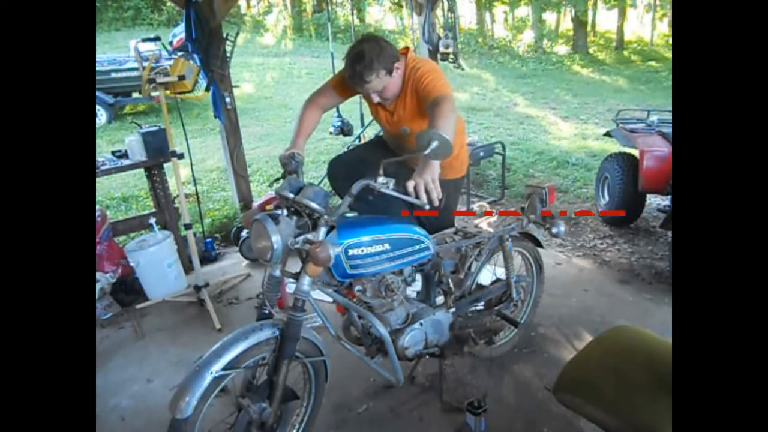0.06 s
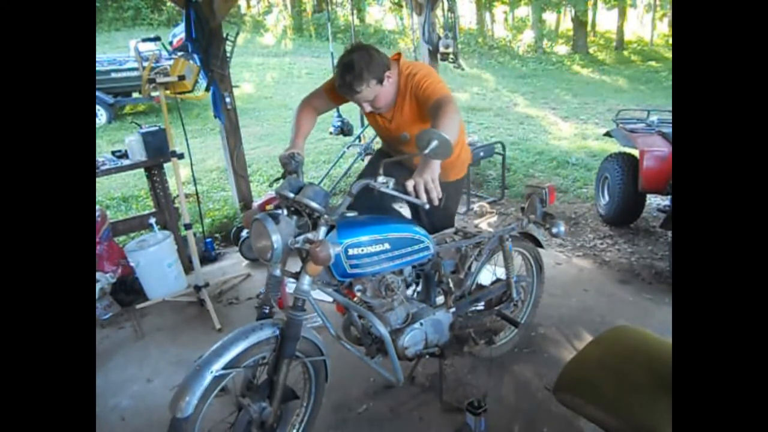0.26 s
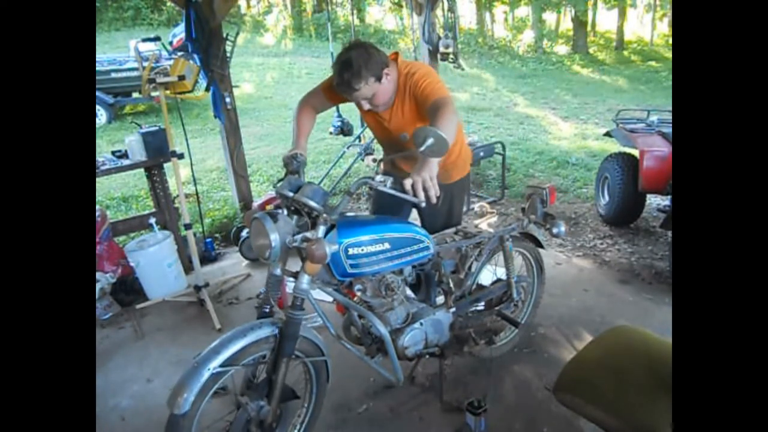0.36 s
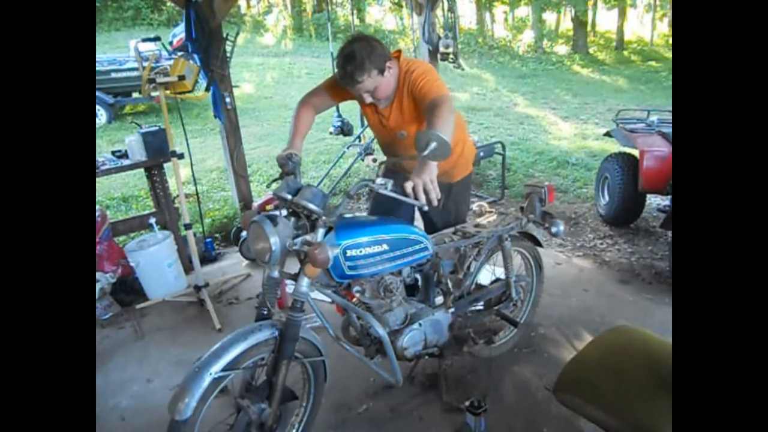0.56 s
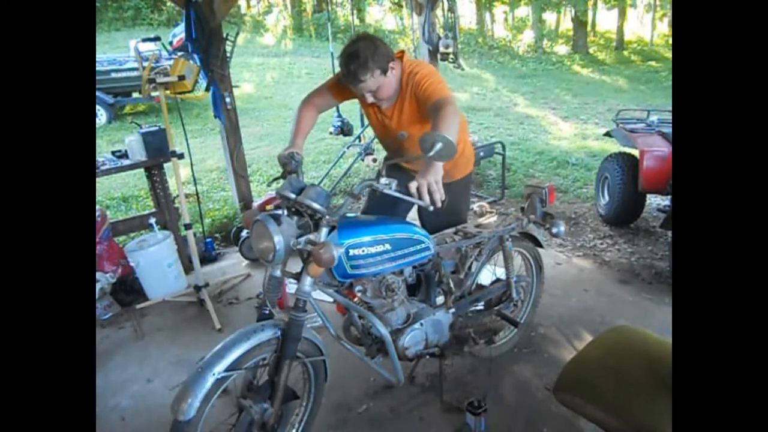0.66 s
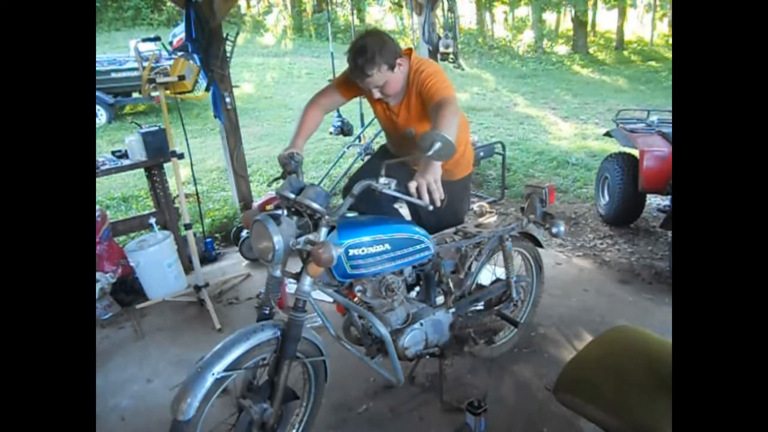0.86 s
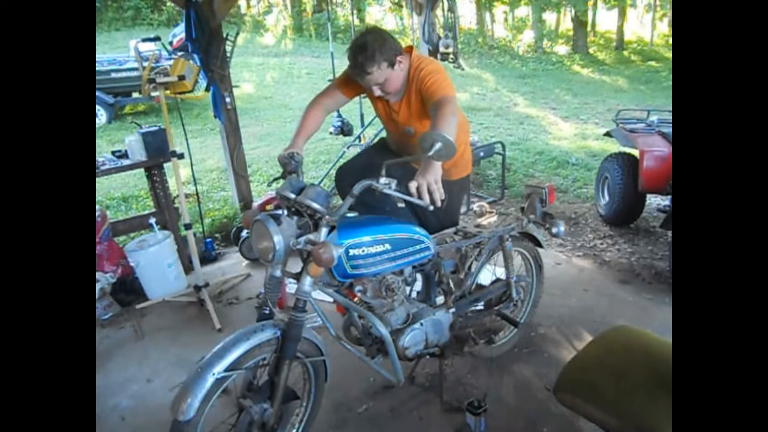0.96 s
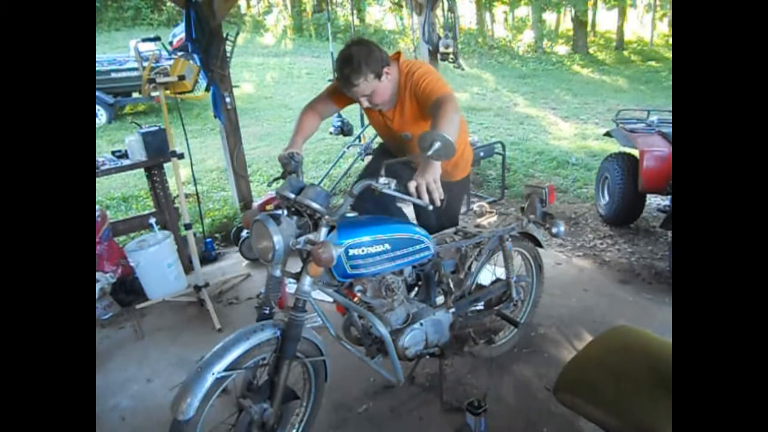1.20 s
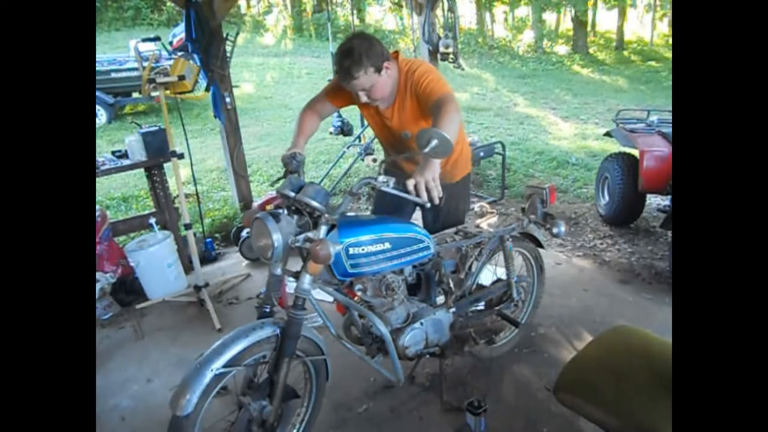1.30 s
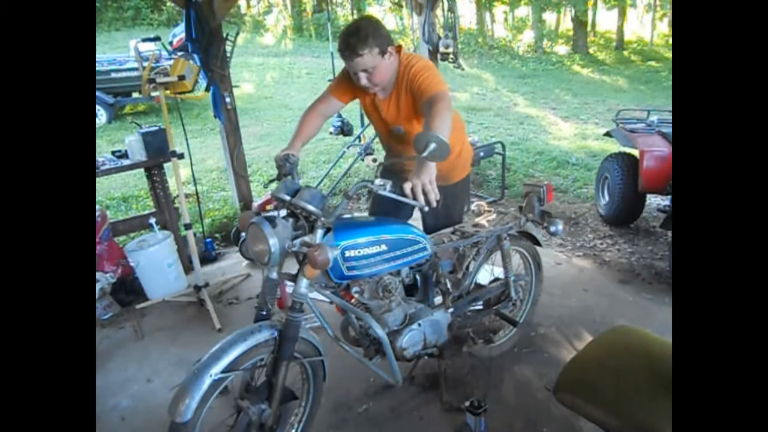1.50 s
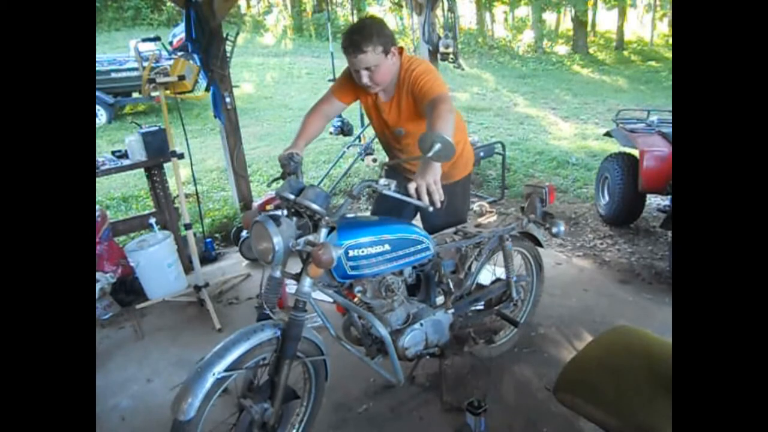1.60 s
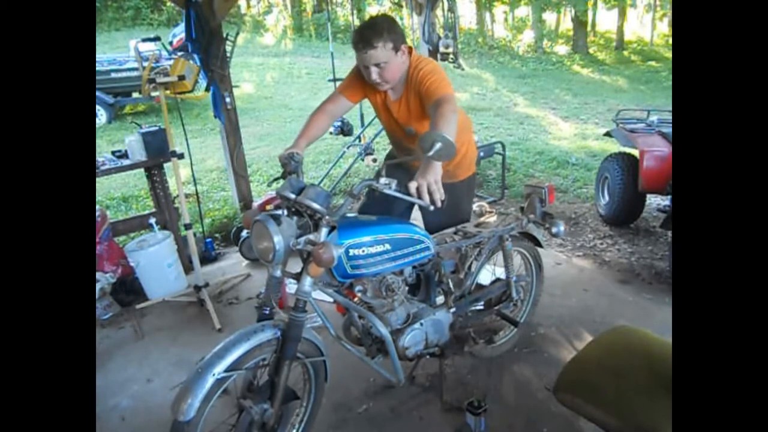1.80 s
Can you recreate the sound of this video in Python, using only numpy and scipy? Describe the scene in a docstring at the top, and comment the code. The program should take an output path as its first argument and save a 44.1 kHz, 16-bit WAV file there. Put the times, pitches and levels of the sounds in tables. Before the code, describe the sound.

An old motorcycle engine is kick-started twice, clattering and puffing briefly without catching.

```python
"""Under an open shed roof, an old motorcycle is kicked over twice and does not catch.
Narrow noise bands scrape, thud, whine and chirp; noisy contacts ring modes of lever, case and valves.
Dense clicks through body resonances rattle as gears, and pulses running to and fro in a pipe puff.
Roof and concrete give a short decaying-noise echo over quiet, coloured outdoor hiss and a faint hum."""
import sys
import numpy as np
from scipy import signal
from scipy.fft import rfft, irfft
from scipy.io import wavfile
from scipy.ndimage import uniform_filter1d

SR = 44100
rng = np.random.default_rng(int(sys.argv[2]) if len(sys.argv) > 2 else 0)


def gain_from_db(level_db):
    """Turn a decibel level (scalar or array-like) into a linear amplitude factor."""
    decades = np.asarray(level_db, float) / 20
    return 10 ** decades


def generate_wav(sig):
    """Save sig (samples, or channels by samples) to the path in sys.argv[1] as 16-bit PCM at SR."""
    pcm = np.round(np.clip(np.atleast_2d(sig).T, -1, 1) * 32767).astype(np.int16)
    wavfile.write(sys.argv[1], SR, pcm)


N = 81585


def band(x, lo_hz, hi_hz):
    """Band-pass."""
    sos = signal.butter(2, [lo_hz, min(hi_hz, SR / 2.2)], "bandpass", fs=SR, output="sos")
    return signal.sosfilt(sos, x)


def unit(x):
    """Scale to rms 1."""
    return x / np.sqrt(np.mean(x ** 2) + 1e-18)


def onset_unit(x):
    """Scale so that the first 10 ms have rms 1."""
    return x / np.sqrt(np.mean(x[:SR // 100] ** 2))


def colour(x, curve):
    """Apply a (frequency [Hz], gain [dB]) curve."""
    hz, curve = np.fft.rfftfreq(N, 1 / SR) + 1, np.array(curve)
    gain_db = np.interp(np.log(hz), np.log(curve[:, 0]), curve[:, 1])
    return irfft(rfft(x) * gain_from_db(gain_db), N)


def add(out, s, x):
    """Mix x in at s seconds."""
    i = int(s * SR)
    out[i:i + len(x)] += x[:N - i]


def ring(x, modes):
    """Decaying resonances driven by x, one two-pole filter per mode."""
    out = 0
    for hz, db, t60_s in modes:
        radius = np.exp(-np.log(1000) / (t60_s * SR))
        w = 2 * np.pi * hz / SR
        out = out + gain_from_db(db) * signal.lfilter([0, np.sin(w)], [1, -2 * radius * np.cos(w), radius ** 2], x)
    return out


BITE_S = 0.00066  # rise of the contact
STRIKE_DB = 13.5  # first hard contact, over the chatter
CRACK_DB, LOW_CRACK_DB = -3.5, -22  # unpitched part over the ring; the low knock is mostly pitched
TAIL_DB, TAIL_T60_S = 15, 0.02


def blows(table, modes):
    """A strike and a few ms of chattering contact crack, ring the part's modes and leave a short noisy tail."""
    out, t = np.zeros(N), np.arange(SR // 4) / SR
    for s, mid_db, low_db, high_db, contact_s in table:
        chatter, hiss = rng.standard_normal((2, len(t)))
        contact = chatter * np.minimum(t / BITE_S, 1) * np.exp(-t / contact_s)
        tail = hiss * np.minimum(t / contact_s, 1) * gain_from_db(TAIL_DB - 60 * t / TAIL_T60_S)
        rung = ring(contact + gain_from_db(STRIKE_DB) * (t == 0), modes)
        for lo, hi, db, crack_db in ((600, 1500, low_db, LOW_CRACK_DB),
                                     (1650, 5000, 0, CRACK_DB),
                                     (5000, 12000, high_db, CRACK_DB)):
            # filtered twice for steep band edges
            pitched = onset_unit(band(band(rung, lo, hi), lo, hi))
            crack = onset_unit(band(band(contact, lo, hi), lo, hi))
            noisy_tail = band(tail, lo, hi) / band(hiss, lo, hi).std()
            add(out, s, gain_from_db(mid_db + db) * (pitched + gain_from_db(crack_db) * (crack + noisy_tail)))
    return out


AIR_DB, AIR_START_DB, AIR_SETTLES_S = -44.5, 5.5, 0.34  # the hiss is a little louder at first
HUM_HZ, HUM_DB = 119, -57.5
# spectrum of the outdoor air: (frequency [Hz], relative density [dB per Hz])
AIR_SPECTRUM = [(20, 11.5), (60, 2.5), (120, -2.5), (250, -3.5), (450, -4), (1100, -7), (3000, -10),
                (6000, -13.5), (10000, -15), (13000, -22)]


def air():
    """Soft outdoor hiss and far rumble from coloured noise, with a faint wavering hum from a narrow band."""
    hum = gain_from_db(HUM_DB) * unit(band(rng.standard_normal(N), HUM_HZ - 4, HUM_HZ + 4))
    hiss = unit(colour(rng.standard_normal(N), AIR_SPECTRUM))
    level_db = AIR_DB + AIR_START_DB * np.exp(-np.arange(N) / SR / AIR_SETTLES_S)
    return hum + hiss * gain_from_db(level_db)


# narrow scrapes, squeaks and soft thuds, probably lever pivot, spring and boot,
# with a long faint insect whine near 7.8 kHz and a faint bird-like chirp near 5.5 kHz:
# (time [s], length [s], frequency [Hz], width [Hz], level [dB])
NARROW_SOUNDS = [(0.106, 0.07, 3220, 800, -41), (0.2, 0.16, 980, 385, -33), (0.215, 0.14, 2970, 400, -37),
                 (0.628, 0.041, 2700, 493, -41.5), (0.679, 0.056, 544, 120, -43),
                 (0.689, 0.1, 410, 110, -47), (0.612, 0.32, 7830, 197.6, -63.5),
                 (0.872, 0.05, 5500, 400, -55), (1.113, 0.068, 7800, 600, -47),
                 (1.228, 0.019, 8000, 500, -38), (1.183, 0.081, 130, 119, -38.5),
                 (1.688, 0.059, 110, 90, -52), (1.726, 0.072, 750, 870, -43),
                 (1.799, 0.073, 7200, 800, -54)]


def squeaks_and_calls():
    """Narrow rough noise bands that come quickly and fade."""
    out = np.zeros(N)
    for s, length_s, hz, width_hz, db in NARROW_SOUNDS:
        n = int(length_s * SR)
        swell = np.sin(np.pi * np.sqrt(np.arange(n) / n))  # peaks a quarter of the way in
        rough = unit(band(rng.standard_normal(SR), hz - width_hz / 2, hz + width_hz / 2))[:n]
        add(out, s, gain_from_db(db) * swell * rough)
    return out


# knocks of the kick lever: (time [s], mid level [dB], low over mid [dB], high over mid [dB], contact decay [s])
LEVER_HITS = [(.1092, -42, -5.5, 2.5, 0.012), (.198, -41, 0, 8, 0.01), (.2045, -30, 10.5, 2, 0.00079),
              (.2473, -47.5, -21, 12, 0.021), (.3257, -29.5, -2, -1, 0.017),
              (1.0979, -44.5, -5.5, 1, 0.0058), (1.1643, -43.5, -23, 2, 0.0081),
              (1.1812, -37.5, -30, 5.5, 0.0039), (1.1845, -36, 13, -21, 0.00091),
              (1.2321, -50.5, 15, 5, 0.011), (1.838, -65.5, 14, 16.5, 0.01)]
# resonances of the lever: (frequency [Hz], relative level [dB], T60 [s])
LEVER_RESONANCES = [(867, 17.5, 0.024), (1108, -9, 0.27), (2160, -35, 0.12), (3043, -6, 0.038),
                    (2973, -21, 0.39), (3340, -19, 0.15), (3600, -13, 0.069), (4900, -15, 0.0088),
                    (5750, 0, 0.016), (6580, -2.5, 0.015), (7600, 7, 0.0047), (8180, 4.5, 0.012),
                    (9440, 6.5, 0.012)]


def lever_blows():
    """Boot, pawl and stops knock the lever, whose modes ring."""
    return blows(LEVER_HITS, LEVER_RESONANCES)


RATTLE_PER_S, RATTLE_SCATTER_DB = 2500, 1.5  # click rate; mean of the random boost per click
CATCH_DB = 0.96  # rms level wobble: teeth bind and free unevenly
# crank and gear train turning, one list per kick: (time [s], rattle level [dB], high over low body [dB])
KICK_TURNS = [
    [(.195, -44, 9), (.212, -25.5, -5), (.24, -36, -3), (.3, -34, 5), (.345, -28.5, -7), (.36, -19.5, 1.5),
     (.41, -23, -3), (.45, -20, -5), (.5, -27, -12), (.524, -33, 3), (.535, -22.5, -1.5), (.62, -42, 4),
     (.7, -47, -1), (.8, -62, -24)],
    [(1.178, -67, -2), (1.195, -28, -10.5), (1.25, -36, -7.5), (1.275, -28.5, -6), (1.33, -23, -4),
     (1.38, -21.5, -7.5), (1.43, -28.5, -1.5), (1.455, -23.5, -1.5), (1.528, -36.5, -2),
     (1.542, -26.5, -12), (1.6, -54.5, 6), (1.7, -51.5, -1.5)],
]
# lower resonances of the crankcase: (frequency [Hz], width [Hz], relative level [dB])
LOW_BODY = [(130, 243, 0.5), (435, 207, 6.5), (800, 330, 7.5), (1402, 397, 6), (1865, 493, 5.5),
            (2890, 1020, 5.5)]
# upper resonances of the crankcase: (frequency [Hz], width [Hz], relative level [dB])
HIGH_BODY = [(3840, 1860, 6), (5700, 930, 3.5), (7100, 420, 1.5), (8980, 500, -6), (9660, 2900, 3)]


def case_body(clicks, peaks):
    """Crankcase resonances as a weighted sum of noisy click bands."""
    return unit(sum(gain_from_db(db) * unit(band(clicks, hz - width_hz / 2, hz + width_hz / 2))
                    for hz, width_hz, db in peaks))


def rattle():
    """Dense uneven tooth clicks, blended with noise, ring the crankcase while the crank turns."""
    t = np.arange(N) / SR
    turn_s, turn_db, bright_db = np.concatenate([np.array(kick) for kick in KICK_TURNS]).T
    happens, side, strength = rng.random((3, N))
    clicks = (happens < RATTLE_PER_S / SR) * np.sign(side - .5)
    clicks = clicks * gain_from_db(-RATTLE_SCATTER_DB * np.log(strength + 1e-9))
    clicks = unit(clicks) + 1.27 * rng.standard_normal(N)
    catch = gain_from_db(CATCH_DB * unit(band(rng.standard_normal(N), 24, 193)))
    turning = sum((t > kick[0][0]) * (t < kick[-1][0]) for kick in KICK_TURNS)
    brightness = gain_from_db(np.interp(t, turn_s, bright_db))
    body = case_body(clicks, LOW_BODY) + brightness * case_body(clicks, HIGH_BODY)
    return turning * catch * gain_from_db(np.interp(t, turn_s, turn_db)) * body


# clanks of the case: (time [s], mid level [dB], low over mid [dB], high over mid [dB], contact decay [s])
CASE_HITS = [(.3462, -34, 11.5, -11, 0.0011), (.405, -35, 12, 9.5, 0.015), (.4279, -20.5, 6, 4, 0.0046),
             (.5258, -21.5, -19, 5, 0.0038), (1.2945, -31, 2, -4, 0.0017), (1.2994, -34, 0.5, 8.5, 0.0016),
             (1.311, -32.5, 5, -6, 0.0022), (1.3528, -18.5, -1.5, -3, 0.0076),
             (1.412, -34.5, -18, 4, 0.0022), (1.4406, -23, -5, 8, 0.0053)]
# resonances of the case: (frequency [Hz], relative level [dB], T60 [s])
CASE_RESONANCES = [(1289.5, 4, 0.12), (1450, 7.5, 0.046), (1934, 22, 0.0096), (2290, 8.5, 0.1),
                   (2426, 8, 0.074), (2802, 9.5, 0.033), (3660, -8.5, 0.081), (3926, 3, 0.12),
                   (5190, 13.5, 0.0044), (5440, 1.5, 0.01), (6525, 17, 0.0099), (6430, -8.5, 0.03),
                   (8010, 11, 0.0084), (8440, 14.5, 0.0068)]


def case_clanks():
    """Hard contacts clank against the case, whose modes ring."""
    return blows(CASE_HITS, CASE_RESONANCES)


# snaps of the valves: (time [s], mid level [dB], low over mid [dB], high over mid [dB], contact decay [s])
VALVE_HITS = [(.3521, -27, 2.5, 7.9, 0.0062), (.4808, -29.5, -8, 5, 0.0097),
              (1.2595, -34, -0.5, 7.5, 0.011), (1.3715, -26.5, 4.5, 3.9, 0.0089),
              (1.5304, -43.5, 9, 11.6, 0.004)]
# resonances of the valves: (frequency [Hz], relative level [dB], T60 [s])
VALVE_RESONANCES = [(900, -12, 0.044), (1980, 8.5, 0.024), (3190, 9.5, 0.017), (7000, -28, 0.012),
                    (7800, 7, 0.013), (8690, 15, 0.019), (9760, 16, 0.0061), (10860, 21, 0.005)]


def valve_snaps():
    """Valves snap with a bright crack and short ringing modes."""
    return blows(VALVE_HITS, VALVE_RESONANCES)


PUFF_DIP, PUFF_FALL = .6, 1.1  # scale of the dip; decay rate of the peak per front width
END_TRIP_S, END_KEEP = 0.00597, 0.7  # delay and strength of the inverted return
PIPE_TRIP_S, PIPE_KEEP, PIPE_RING_DB = .0208, 0.48, -42  # repeat delay, strength kept each trip
GAS_DB, GAS_T60_S = -8.5, 0.16  # gas noise over its puff
# exhaust puffs: (time [s], level [dB], front width [s])
EXHAUST_PUFFS = [(0.3702, -9.5, .0008), (0.4948, -15, 0.00078), (1.2736, -12, 0.00074),
                 (1.3839, -14.5, 0.00087), (1.5483, -21.5, 0.00077)]
# resonances of the exhaust pipe: (frequency [Hz], relative level [dB], T60 [s])
PIPE_RESONANCES = [(104.7, -7, 0.28), (146.6, -7.5, 0.1), (241, -1.5, 0.038), (410, 3, 0.15)]


def exhaust():
    """Each opening valve sends a dip-then-peak pulse; the open end inverts it, it runs to and fro, gas rushes."""
    pulses, gas = np.zeros(N), np.zeros(N)
    t = np.arange(-SR // 200, SR // 5) / SR  # starts 5 ms early to hold the dip
    for s, db, width_s in EXHAUST_PUFFS:
        u = t / width_s
        pulse = np.e * u * np.exp(-np.abs(u) * np.where(u < 0, 1, PUFF_FALL))
        add(pulses, s - 1 / 200, gain_from_db(db) * pulse * np.where(u < 0, PUFF_DIP, 1))
        add(gas, s - 1 / 200, (t > 0) * gain_from_db(db + GAS_DB - 60 * t / GAS_T60_S))
    returned = uniform_filter1d(np.roll(pulses, int(END_TRIP_S * SR)), size=40)
    trip, out = pulses - END_KEEP * returned, np.zeros(N)
    for k in range(5):
        out += PIPE_KEEP ** k * np.roll(trip, int(k * PIPE_TRIP_S * SR))
        trip = uniform_filter1d(trip, size=20)  # each trip blunts the pulse
    rush = gas * unit(band(rng.standard_normal(N), 115, 510))
    return out + gain_from_db(PIPE_RING_DB) * ring(pulses, PIPE_RESONANCES) + rush


SHED_DB, SHED_GAP_S = -10.5, 0.0043  # echo level, wait before the echo
SHED_T60_S, SHED_TREBLE_T60_S = 0.38, 0.26


def shed(x):
    """Diffuse echoes from roof, floor and benches as decaying noise; the treble dies first."""
    t = np.arange(SR // 2) / SR
    noise = rng.standard_normal(len(t))
    body = band(noise, 222, 1770) * gain_from_db(-60 * t / SHED_T60_S)
    treble = band(noise, 5100, 21000) * gain_from_db(-60 * t / SHED_TREBLE_T60_S)
    tail = (body + treble) * (t > SHED_GAP_S)
    return x + gain_from_db(SHED_DB) * signal.fftconvolve(x, tail / np.sqrt(np.sum(tail ** 2)))[:N]


def scene():
    """The motorcycle and small calls echoing in the shed, over the dry outdoor air."""
    metal = lever_blows() + case_clanks() + valve_snaps()
    inside = squeaks_and_calls() + metal + rattle() + exhaust()
    return (shed(inside) + air())[None]


def band_limit(x):
    """A steep low-pass at the top of the band."""
    return signal.sosfilt(signal.butter(12, 12740, fs=SR, output="sos"), x)


# response of the microphone: (frequency [Hz], gain [dB])
MIC_RESPONSE = [(20, -30), (60, -6.5), (8000, -5.5), (10200, -7.5), (10900, -19.5), (12000, -21.5),
                (12500, -44), (12800, -81)]


def record(dry):
    """A small microphone that fades above 10 kHz and stops near 12.5 kHz."""
    heard = colour(dry, MIC_RESPONSE)
    return band_limit(heard)


dry = scene()
out = record(dry)
generate_wav(out)
```